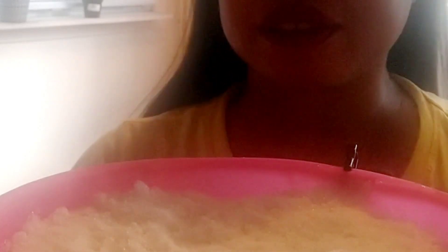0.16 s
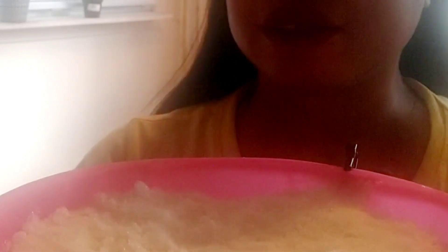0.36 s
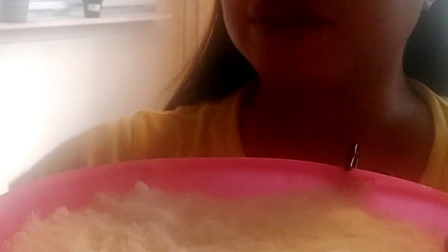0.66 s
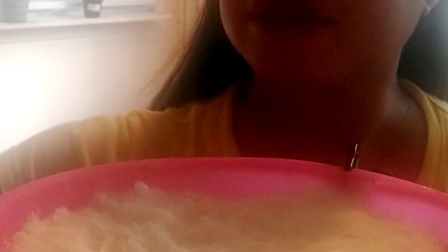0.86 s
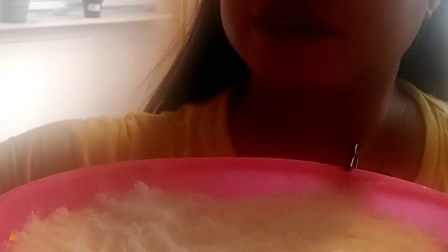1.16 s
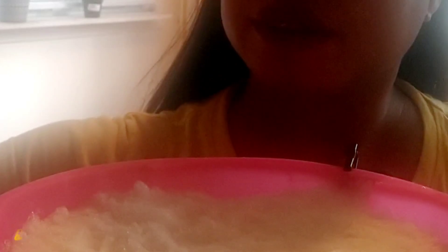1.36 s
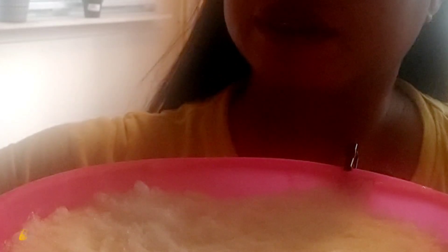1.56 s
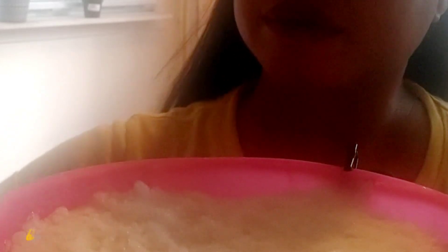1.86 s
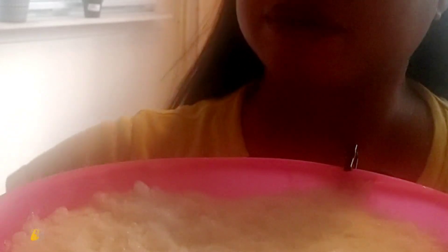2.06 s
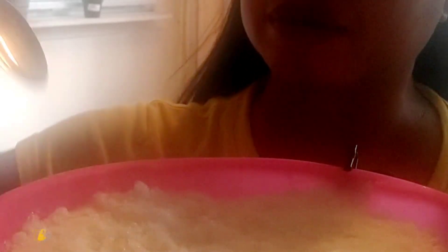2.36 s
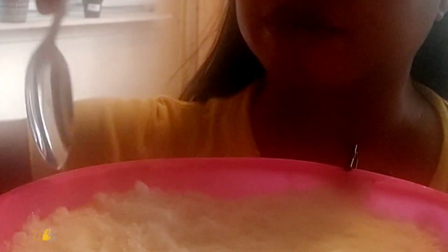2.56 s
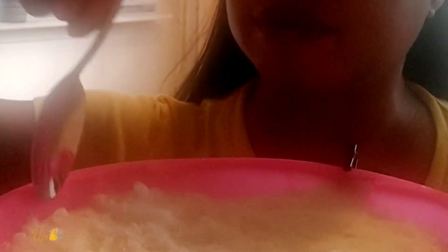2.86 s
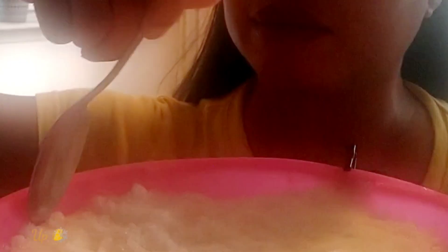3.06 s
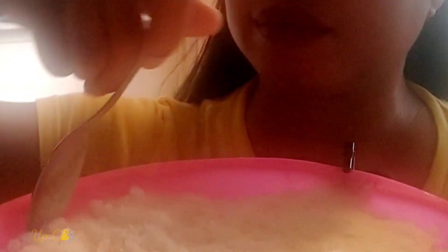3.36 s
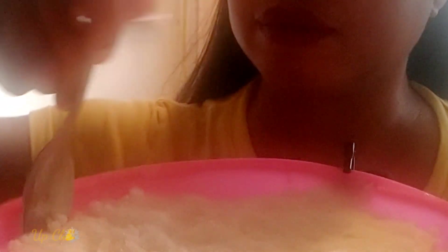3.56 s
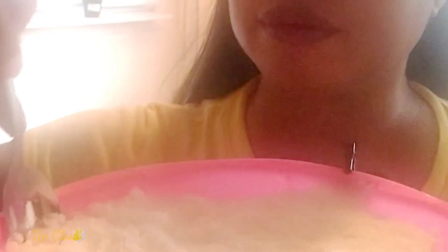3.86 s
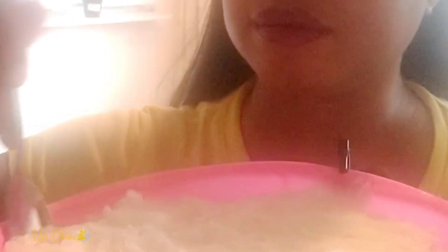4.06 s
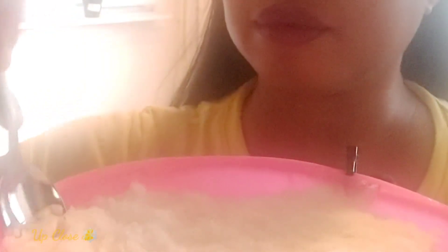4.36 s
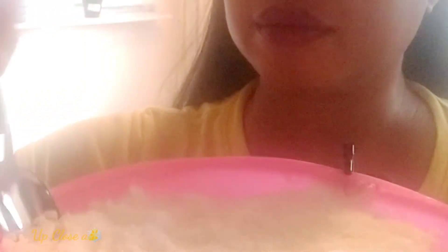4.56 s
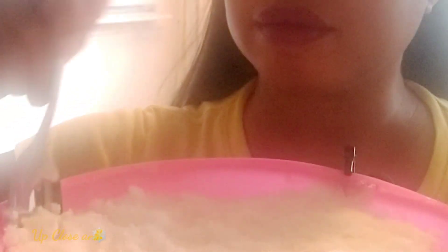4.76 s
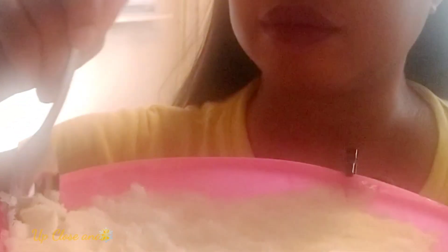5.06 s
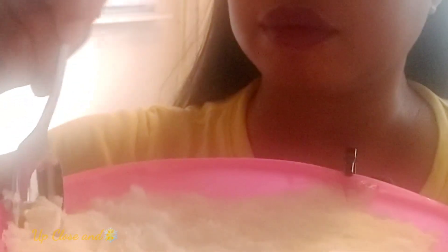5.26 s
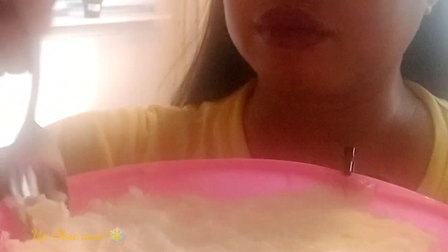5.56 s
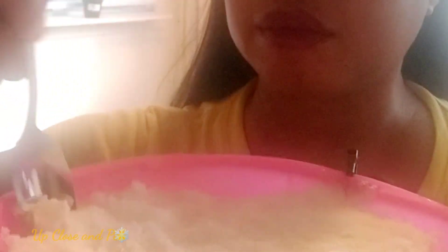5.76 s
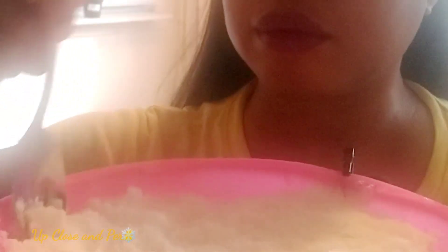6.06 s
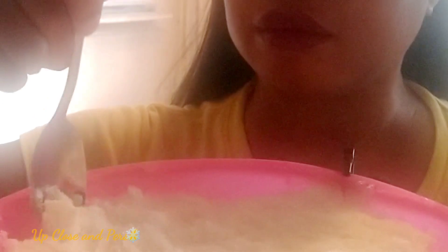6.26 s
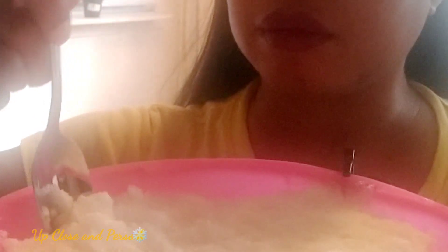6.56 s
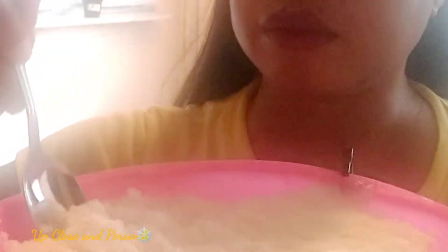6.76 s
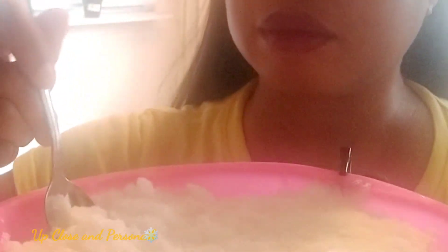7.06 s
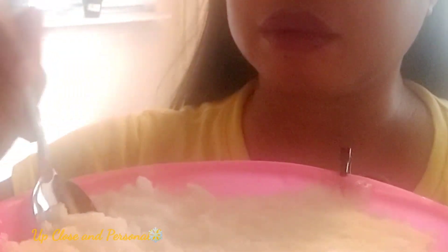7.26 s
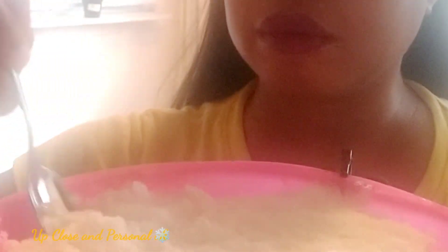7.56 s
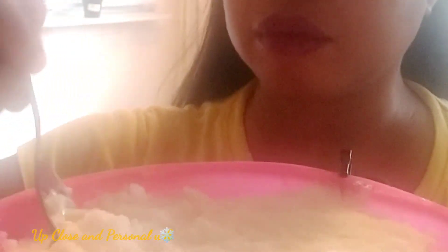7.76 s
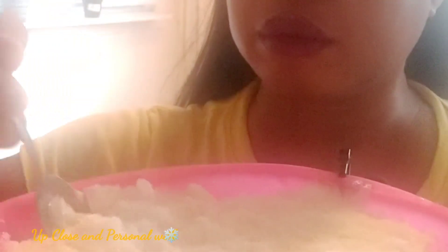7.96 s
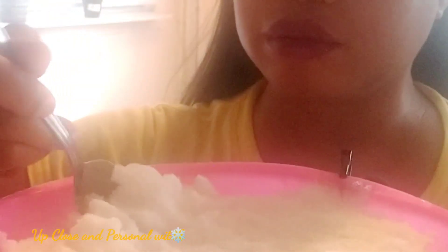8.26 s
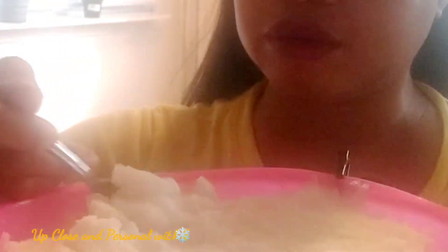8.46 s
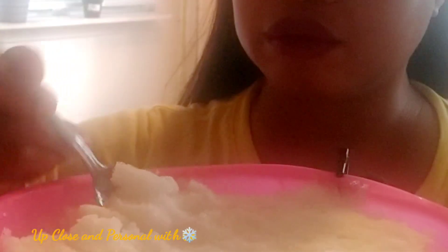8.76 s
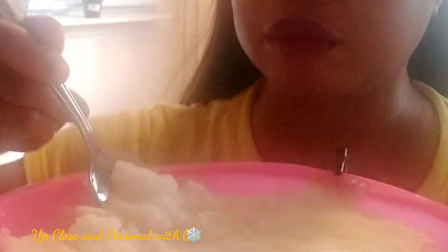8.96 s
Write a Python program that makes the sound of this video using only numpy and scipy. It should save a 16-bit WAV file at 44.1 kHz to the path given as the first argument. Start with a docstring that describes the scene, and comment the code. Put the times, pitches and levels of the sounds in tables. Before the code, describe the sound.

Faint room hum, a hard knock with a rattle, then crisp close crunching as a steel spoon digs crushed ice in a plastic bowl.

```python
"""A quiet room is heard first, its air noise under an appliance's hum and a faint mains buzz.
Close to a phone's microphone, a steel spoon then digs and scrapes powdery ice in a plastic bowl on a table.
Dense random fractures and single snaps ring the modes of bowl and blade; thuds are short low sines.
Something hard set down rings the table's modes, loose things rattle, and a short room tail follows."""
import sys
import numpy as np
from scipy import signal
from scipy.fft import rfft, irfft, next_fast_len
from scipy.io import wavfile
from scipy.ndimage import uniform_filter1d, map_coordinates

SR = 44100
rng = np.random.default_rng(int(sys.argv[2]) if len(sys.argv) > 2 else 0)


def inscribe(sig):
    """Save sig as 16-bit PCM at rate SR to the path in sys.argv[1].

    A 1-D sig is mono; a 2-D sig holds one channel per row.
    Samples are clipped to [-1, 1] before scaling.
    """
    pcm = np.round(np.clip(np.atleast_2d(sig).T, -1, 1) * 32767)
    wavfile.write(sys.argv[1], SR, pcm.astype(np.int16))


N = 402633
T = np.arange(N) / SR


def amp(db):
    """dB to gain."""
    return 10 ** (np.asarray(db) / 20)


def unit(x):
    """Scaled to rms 1."""
    return x / np.sqrt(np.mean(x ** 2) + 1e-20)


def at_times(points, s):
    """Straight lines through (time, value) points, read at times s."""
    return np.interp(s, *np.transpose(points))


def along(points, hz):
    """(frequency, value) points joined on a log frequency axis."""
    f, v = np.transpose(points)
    return np.interp(np.log(hz + 1), np.log(f + 1), v)


def wobble(rate):
    """A smooth random curve, rate knots a second."""
    return map_coordinates(rng.standard_normal(int(N * rate / SR) + 4), [T * rate])


def filtered(x, response):
    """x times a complex response of frequency."""
    m = next_fast_len(N + SR // 2)
    return irfft(rfft(x, m) * response(np.fft.rfftfreq(m, 1 / SR)), m)[..., :N]


def coloured(x, points):
    """x shaped by (frequency, level) points."""
    return filtered(x, lambda hz: amp(along(points, hz)))


def modes(table):
    """Causal response of resonances whose neighbours swing in opposite phase."""
    def response(f):
        total = 0
        for k, (centre, width, db) in enumerate(table):
            peak = 1j * f * width / (centre * centre - f * f + 1j * f * width)
            total = total + (-1) ** k * amp(db) * peak
        return total
    return response


def add(track, s, sound):
    """Mix a sound in at time s."""
    part = track[round(s * SR):][:len(sound)]
    part += sound[:len(part)]


# colour of the room's air noise: (frequency [Hz], relative level [dB per Hz])
AIR_COLOUR = [(15, -36), (25, -6), (79, -4), (173, -7.5), (253, -6.5), (297, -7.5), (469, -7), (509, -12.5),
              (782, -19), (970, -16.5), (1340, -24), (1570, -23.5), (8350, -43.5), (11500, -44.5),
              (15500, -48)]
# steady tones of the appliance: (frequency [Hz], relative level [dB])
HUM_TONES = [(129.2, -62), (172.3, -57.5), (215.3, -67), (301.5, -65.5), (360.7, -67), (516.8, -69),
             (576.0, -73.5), (969.0, -80.5), (995.9, -75.5)]


def room_tone():
    """Broadband air noise with appliance tones that waver in level and phase."""
    air_db = -56.5 + 0.082 * wobble(2.76)
    air = unit(coloured(rng.standard_normal(N), AIR_COLOUR))
    hum = np.zeros(N)
    for hz, db in HUM_TONES:
        level = amp(db + 3.5 + 2.25 * wobble(6))
        cycles = hz * T + 0.079 * wobble(4) + rng.random()
        hum += level * np.sin(2 * np.pi * cycles)
    return amp(air_db) * air + hum


# strength of the mains buzz: (frequency [Hz], relative level of the strongest lines [dB])
BUZZ_COLOUR = [(6000, -110), (8700, -97), (10000, -93), (12000, -92.5), (13500, -96), (15000, -102)]
MAINS_HZ, SPARK_HZ = 60, 627.5  # repeats of the whole run; sparks within it
SPARKS, FIRST_SPARK_S = 5, 0.00596


def buzz():
    """A short run of sparks in every mains cycle, written as mains multiples."""
    hz = MAINS_HZ * np.arange(100, 256)
    spark_s = FIRST_SPARK_S + np.arange(SPARKS) / SPARK_HZ
    run = np.exp(-2j * np.pi * np.outer(hz, spark_s)).mean(axis=1)
    lines = amp(along(BUZZ_COLOUR, hz) - 0.3) * run
    cycle = np.arange(SR // MAINS_HZ) / SR
    wave = np.sqrt(2) * lines @ np.exp(2j * np.pi * np.outer(hz, cycle))
    return np.resize(wave.real, N)


# how long the room answers: (frequency [Hz], time to fall 60 dB [s])
ROOM_DECAY = [(200, 0.31), (2000, 0.41), (10000, 0.065)]


def room(x):
    """The room's answer is noise in which each frequency dies at its own speed."""
    hz, t, z = signal.stft(rng.standard_normal(SR // 2), SR, nperseg=256)
    decay = amp(-60 * t / along(ROOM_DECAY, hz)[:, None])
    tail = signal.istft(z * decay, SR, nperseg=256)[1]
    late = np.pad(x, (200, 0))  # 200 samples before the first reflection
    return signal.fftconvolve(late, tail / np.linalg.norm(tail))[:N]


def crushing(rate, spread_db, hiss):
    """Random fractures of widely spread size, in clumps, over a steady hiss."""
    breaks = rng.random(N) < rate * amp(5 * wobble(40)) / SR
    sizes = rng.standard_normal(N) * amp(spread_db * rng.exponential(size=N))
    return unit(breaks * sizes) + hiss * rng.standard_normal(N)


# colour of the rattle: (frequency [Hz], relative level [dB per Hz])
RATTLE_COLOUR = [(100, -24), (250, 0), (550, -0.5), (1000, -13), (3000, -20.5), (8000, -28.5), (15000, -36)]
# how loudly loose things rattle: (time [s], level [dB])
RATTLE_LEVEL = [(1.37, -76), (1.38, -59.5), (1.44, -56), (1.47, -76), (1.487, -53), (1.492, -34),
                (1.52, -50.5), (1.6, -50), (1.63, -61), (1.72, -76)]


def rattle():
    """Loose things chatter in dense random contacts."""
    loose = coloured(crushing(rate=610, spread_db=3.5, hiss=0.93), RATTLE_COLOUR)
    level_db = np.interp(T, *np.transpose(RATTLE_LEVEL), left=-120, right=-120)
    return amp(level_db) * unit(loose)


# something hard set down on the table: (time [s], relative level [dB], hardness [dB per 3 octaves])
KNOCKS = [(1.378, -27, -10.5), (1.39, -48, -8), (1.418, -37, -10), (1.427, -41, -1), (1.4887, -23.5, 5.5),
          (1.496, -25, 0), (1.5184, -46, -8)]
# modes of the table: (frequency [Hz], relative level [dB], time to fall 60 dB [s])
TABLE_MODES = [(265, -9, 0.056), (477, 8.5, 0.014), (526, -7.5, 0.08), (697, -4.5, 0.055), (837, 2, 0.025),
               (1554, -7, 0.05), (2250, -9, 0.036), (2530, -14, 0.051), (3275, -15, 0.04),
               (4060, -8.5, 0.025), (5640, -24, 0.043), (6850, -18, 0.026), (7740, -11, 0.014)]


def knocks():
    """Each blow rings the table at new strengths, a harder blow favouring the higher modes."""
    out, t = np.zeros(N), np.arange(SR // 3) / SR
    hz, level_db, t60 = np.transpose(TABLE_MODES)[..., None]
    scatter = rng.normal(0, 1.5, (len(KNOCKS), len(TABLE_MODES), 1))
    onset = 1 - np.exp(-t / 0.000075)
    for (s, db, hard_db), luck_db in zip(KNOCKS, scatter):
        tilt_db = hard_db * np.log2(hz / 450) / 3
        size = amp(db - 9.0 + level_db + luck_db + tilt_db - 60 * t / t60)
        add(out, s, np.sum(size * np.sin(2 * np.pi * hz * t), axis=0) * onset)
    return out + rattle()


# the bowl pushed against the table:
# (time [s], relative level [dB], pitch [Hz], time to fall 60 dB [s] (10 ms at least), edge over level [dB])
THUDS = [(.472, -35, 109, .06, -2.5), (2.851, -36, 112, 0.079, -3), (3.232, -27, 116, 0.045, -3.5),
         (3.262, -40.5, 110, 0.042, 3.5), (3.381, -36.5, 131, 0.023, 0), (3.469, -29.5, 161, 0.049, -8),
         (3.475, -32, 205, 0.019, 6.5), (3.774, -38, 130, 0.034, -1), (4.238, -25.5, 163, 0.0099, 1.5),
         (4.34, -37, 85, 0.071, -5), (4.411, -38.5, 150, 0.026, 7), (4.479, -34, 110, 0.051, -4),
         (4.526, -34.5, 140, 0.039, 1.5), (5.148, -56, 150, 0.026, -2), (5.784, -45, 133, 0.065, 3),
         (6.144, -42, 170, 0.036, 4), (6.853, -38, 89, 0.086, -7), (7.315, -36, 148, 0.023, -11),
         (7.502, -37.5, 100, 0.038, -17), (7.671, -35, 100, 0.035, -18), (8.187, -47, 100, 0.043, -3),
         (8.604, -38, 101, 0.065, -15)]


def thuds():
    """A low push that dies in a few cycles, led by a short blunt edge."""
    out, t = np.zeros(N), np.arange(SR // 5) / SR
    edge = t / 0.00032 * (1 - t / 0.00071) * np.exp(1 - t / 0.00059)
    for s, db, hz, t60, edge_db in THUDS:
        push = amp(6 - 60 * t / max(t60, .01)) * np.sin(2 * np.pi * hz * t)
        add(out, s, amp(db) * (push + amp(edge_db) * edge))
    return out


# each push of the spoon through the ice: (time of the peak [s], swell [s], fade [s], crunch level [dB],
# blade over crunch [dB], shake of the table [dB])
PUSHES = [(.479, .3, .25, -76, -12, -47.5), (.838, .08, 0.085, -61, -6, -54),
          (.914, .06, 0.17, -65, -6, -70), (1.303, 0.14, 0.059, -63.5, -13, -57),
          (2.869, 0.029, 0.048, -55, -5, -41.5), (3.231, .07, 0.05, -59.5, -12, -47),
          (3.322, 0.15, .07, -58, -5, -43.5), (3.376, 0.024, 0.039, -46, -4, -39),
          (3.474, 0.16, 0.099, -52.5, -3, -44), (3.586, .06, 0.027, -50, -1.5, -49),
          (3.688, 0.37, 0.058, -59, -4, -54), (3.79, 0.058, 0.076, -46, -1.5, -53),
          (3.887, .2, 0.06, -51.5, -3.5, -46.5), (3.993, 0.089, 0.041, -54.5, -3.5, -53),
          (4.053, 0.049, 0.054, -56.5, -2, -66), (4.127, 0.16, 0.24, -58.5, -6, -52),
          (4.244, 0.076, 0.074, -45, -3.5, -39.5), (4.348, 0.024, .05, -49.5, -1, -49),
          (4.412, .07, .1, -45.5, -4.5, -41), (4.502, 0.13, 0.11, -46.5, -6, -41.5),
          (4.771, 0.41, 0.079, -58, -7, -60), (4.865, .15, .25, -58, -7, -56),
          (5.158, 0.17, 0.12, -51.5, -7, -51.5), (5.356, 0.089, 0.11, -59.5, -8, -51.5),
          (5.533, 0.11, 0.18, -62.5, -12, -65), (5.615, 0.14, 0.12, -65, -3, -51),
          (5.789, 0.25, 0.22, -65.5, -3.5, -59), (5.944, 0.15, 0.042, -61, -7, -57),
          (6.15, 0.027, 0.058, -49, -8.5, -47), (6.431, .3, .3, -70.5, -0.5, -53.5),
          (6.693, .07, 0.11, -53.5, -5, -47.5), (6.824, 0.29, 0.1, -51.5, -7.5, -47.5),
          (6.959, .1, 0.35, -48.5, -3.5, -44), (7.042, 0.097, 0.078, -37.5, -9.5, -44),
          (7.12, 0.13, 0.041, -46, -5, -42), (7.17, 0.1, 0.082, -53.5, -11, -46.5),
          (7.343, 0.4, 0.1, -52.5, -8.5, -58.5), (7.491, 0.15, 0.074, -54.5, -7, -56),
          (7.605, 0.19, .08, -60.5, -16, -55), (7.657, 0.014, 0.041, -48, -6, -51),
          (7.7, 0.04, 0.29, -47.5, -8.5, -52), (7.8, 0.15, 0.03, -49, -4, -43.5),
          (7.85, 0.023, .3, -56.5, -2, -59), (8.046, 0.42, 0.21, -51, -7, -47),
          (8.205, 0.12, 0.12, -41.5, -3.5, -40), (8.317, 0.19, 0.1, -51, -6.5, -41),
          (8.596, .15, 0.26, -41, -6, -44), (8.782, .3, 0.13, -47.5, -4, -49),
          (8.956, 0.087, 0.18, -55, -7, -54.5), (9.129, .15, .1, -64, -3, -60)]
# between pushes, one level each [dB]: crunch, blade, shake
RESTING_LEVELS = (-82.5, -81.5, -68.5)
FADE_DB = 21.5  # change of level over one swell or fade time


def pushes():
    """Crunch, blade and shake in dB: every push swells to its peak and fades, over a resting level."""
    t = np.arange(N // 64 + 1) * 64 / SR
    power = amp(RESTING_LEVELS)[:, None] ** 2 * np.ones(len(t))
    for s, swell, fade, db, blade_db, shake_db in PUSHES:
        drop_db = FADE_DB * np.maximum((s - t) / max(swell, .005), (t - s) / max(fade, .005))
        peak_db = np.array([[db], [db + blade_db], [shake_db]])
        power = power + amp(peak_db - drop_db) ** 2
    return [np.interp(T, t, 10 * np.log10(p)) for p in power]


# sliding powder: (time [s], hiss over the fractures [gain])
POWDER = [(0, .6), (4.6, .55), (6.5, .7), (7.5, .7), (7.95, 1.14), (9.13, 1.2)]


def small_snaps():
    """Lesser breaks at chance moments, following the crunch around them and muffled by powder."""
    luck = rng.random((200, 5))
    s = luck[:, 0] * (N - 1) / SR
    muffle_db = 6.5 * at_times(POWDER, s)
    scatter_db = -3.5 * np.log(luck[:, 1] + 0.056)
    db = np.interp(s, T, pushes()[0]) + 9.5 - muffle_db + scatter_db
    bowl_hz, blade_hz = 1300 * 3.9 ** luck[:, 2], 5000 * 2.0 ** luck[:, 4]
    return list(zip(s, db, bowl_hz, -14 + 14 * luck[:, 3], blade_hz))


# the clearest single crystals breaking, and small handling ticks:
# (time [s], relative level [dB], bowl pitch [Hz], blade over bowl, before trims [dB], blade pitch [Hz])
CLEAR_SNAPS = [(0.038, -51, 4030.0, 4, 6600), (0.8022, -43, 4000.0, -6, 5440.0),
               (0.8201, -45, 2470.0, -6, 5160.0), (0.834, -45, 1200.0, -2, 5000.0),
               (0.9056, -46.0, 4260.0, 1, 6170.0), (0.9425, -46.5, 2560.0, -9.0, 5900.0),
               (1.0588, -43, 1700.0, -13, 5630.0), (1.3127, -44, 1890.0, -12, 4930),
               (1.9129, -52, 2290.0, -13.0, 5830.0), (2.1274, -56, 2460.0, 3, 5950.0),
               (2.8609, -48.0, 4850.0, 4, 6180.0), (3.1979, -45.5, 2260.0, 0.0, 5320.0),
               (3.2274, -39, 1520.0, -7, 6290.0), (3.2784, -41, 2190.0, -3, 5840.0),
               (3.3017, -38.5, 1440.0, -2, 6080.0), (3.3669, -34.0, 4760.0, 4, 5950),
               (3.3753, -31.0, 1550, 1, 5950), (3.377, -36, 2280, 6, 7500),
               (3.3814, -34, 3370.0, -3, 6450.0), (3.4039, -40, 1370.0, -8.0, 6660.0),
               (3.4171, -38.0, 4010.0, -2.0, 5080.0), (3.435, -29, 2270, -13.0, 5600.0),
               (3.4679, -35, 1620.0, -1, 6000.0), (3.4722, -31, 3500.0, 0, 6430.0),
               (3.476, -25, 3700, -0.5, 5130.0), (3.5809, -44, 1350.0, 3, 5280.0),
               (3.5842, -37.5, 1470.0, -4, 7030.0), (3.5916, -39, 4990.0, 0.0, 7660.0),
               (3.772, -32.5, 1280, -5, 7650.0), (3.7936, -38, 4600.0, -7.0, 5040.0),
               (3.958, -27, 3940.0, -6, 4970), (4.121, -41.0, 3490.0, -10.0, 5000.0),
               (4.2146, -30, 1420, -12, 5000.0), (4.2392, -31, 4140.0, -10, 7810.0),
               (4.2465, -31, 1660, -2, 6100.0), (4.2567, -38, 1190, -1, 6660.0),
               (4.3449, -45, 1660.0, 2, 9000), (4.3524, -41, 4000.0, -2.0, 7730.0),
               (4.4079, -27.0, 1930.0, -4, 5010.0), (4.41, -30, 1270, 2, 5230),
               (4.4493, -31.5, 3380.0, -8, 5150.0), (4.461, -35.0, 3070.0, -7.0, 5000.0),
               (4.488, -29.0, 3070.0, -7, 6120.0), (4.4944, -33, 1450.0, -7.0, 5970.0),
               (4.5044, -31.0, 1310.0, -13.0, 5920.0), (4.5109, -33, 2850.0, -10.0, 5480.0),
               (4.526, -30, 1300.0, -12.0, 6320.0), (4.5545, -37, 1970.0, -4, 5900.0),
               (4.6347, -41, 1440.0, -4, 5180.0), (4.7726, -36.5, 2600, -3, 5070),
               (4.8649, -44.0, 3610.0, -6.0, 5690.0), (4.9504, -44, 3270.0, -3, 7850.0),
               (4.9792, -44, 1640, -16.0, 5000.0), (5.1177, -46, 3430.0, 1, 7880.0),
               (5.1466, -31.5, 3270, -14.0, 5800.0), (5.1638, -37, 4720.0, 0, 7860.0),
               (5.351, -38, 3260.0, -21.0, 5750.0), (5.5023, -48, 3230.0, -18, 6080.0),
               (5.611, -40, 1960, 3.5, 6140.0), (5.77, -45, 3030.0, -8, 7840.0),
               (5.9161, -51.0, 1620.0, 6.5, 6180.0), (6.087, -40.5, 2530, -8, 5000.0),
               (6.1444, -45, 3000.0, -11, 5730.0), (6.1497, -44, 4670.0, -11, 6100.0),
               (6.687, -35, 1750.0, -10, 5000.0), (6.6943, -35.5, 2030.0, -2.0, 5000.0),
               (6.832, -40.0, 2060.0, -2, 7140.0), (7.0095, -27.0, 1970, -12, 5020.0),
               (7.025, -27, 1890.0, -9, 5000.0), (7.0303, -24.0, 1670.0, 4, 9200),
               (7.037, -12.0, 1920, -9, 5000.0), (7.0421, -9.5, 2080, -11, 5080.0),
               (7.0437, -11.5, 3020, -9, 9030), (7.0445, -18, 2050, -6, 9000),
               (7.0468, -20, 3430, -10, 9050), (7.059, -17.5, 2120, -6, 8900),
               (7.063, -20, 2490.0, -10.0, 5000.0), (7.1213, -24.5, 1900.0, -14, 9050),
               (7.1659, -33.5, 3240, -13, 7760.0), (7.245, -40, 1990.0, -9, 8170.0),
               (7.3959, -39, 3970.0, -11, 8110.0), (7.5102, -40, 3320.0, -12.0, 5000.0),
               (7.6504, -33, 3890.0, -5.0, 8190.0), (7.654, -33, 3000, -9, 9000),
               (7.6603, -29, 3410.0, -2.0, 9030.0), (7.6949, -33, 2710.0, -15.0, 5000.0),
               (7.781, -36, 3720.0, -11, 7750.0), (7.7939, -27.5, 4110.0, -6, 7260.0),
               (7.7977, -28, 4660.0, -10, 6450.0), (7.8421, -36, 4780.0, -1.0, 5790.0),
               (7.8481, -29.5, 4770.0, -2, 9200), (7.8858, -43, 4540.0, 1, 7380.0),
               (8.2714, -38.0, 3300.0, -7.0, 7240.0), (8.3464, -42, 1900.0, -11.0, 5870.0),
               (8.4709, -40, 2850.0, 1, 5780.0), (8.5188, -40.0, 3230.0, -5.0, 6010.0),
               (8.7304, -36, 3010.0, -3.0, 7800.0), (8.943, -39, 3260, -10.0, 5000.0),
               (9.008, -38, 4880.0, -3, 5440), (9.0457, -46, 2870.0, -3, 5000.0)]
# modes of the plastic bowl: (frequency [Hz], width [Hz], relative level [dB])
BOWL_MODES = [(1254, 227, -3.5), (1660, 320, -0.5), (2050, 276, -3), (2510, 500, -4.5), (3230, 376, -0.5),
              (4057, 287, -1), (4860, 290, -2.5)]
# modes of the spoon's blade: (frequency [Hz], width [Hz], relative level [dB])
BLADE_MODES = [(5880, 750, 3.5), (6750, 240, 2.5), (7010, 260, 2), (8030, 320, 4), (8570, 260, 3.5),
               (10430, 3300, -7), (13500, 3000, -14)]
CRACK_S, JOLT_T60_S, RING_CYCLES = 0.00008, 0.0025, 14  # onset; jolt's fall; bowl pitch cycles to fall 60 dB


def snaps():
    """Each break is a sharp crack: a few cycles at two pitches and a brief jolt to bowl and blade."""
    rings, bowl, blade = np.zeros(N), np.zeros(N), np.zeros(N)
    t = np.arange(SR // 50) / SR

    def ring(db, hz, t60):
        return amp(db - 60 * t / t60) * np.sin(2 * np.pi * hz * t) * (1 - np.exp(-t / CRACK_S))

    def dull(hz):
        treble_loss = 1 / (1 + 1j * hz / 10500) ** 2
        return treble_loss * (1j * hz / (900 + 1j * hz)) ** 3

    breaks = small_snaps() + [tuple(row) for row in CLEAR_SNAPS]
    jolts = rng.standard_normal((len(breaks), 2, len(t))) * amp(-60 * t / JOLT_T60_S)
    jolts /= np.linalg.norm(jolts, axis=2, keepdims=True)
    for (s, db, hz, blade_db, blade_hz), jolt in zip(breaks, jolts):
        add(rings, s, ring(db + 3.0, hz, RING_CYCLES / hz))
        add(rings, s, ring(db + blade_db + 1.0, blade_hz, 0.0078))
        add(bowl, s, amp(db + 20) * jolt[0])
        add(blade, s, amp(db + blade_db + 16) * jolt[1])
    jolted = filtered(bowl, modes(BOWL_MODES)) - filtered(blade, modes(BLADE_MODES))
    return filtered(rings + jolted, dull)


def shifting(force, table, shift_db):
    """Resonances drift apart in strength as the point of contact moves; treble falls above 9.5 kHz."""
    x = np.zeros(N)
    for k, row in enumerate(table):
        x += amp(shift_db * wobble(16)) * (-1) ** k * filtered(force, modes([row]))
    return unit(filtered(x, lambda hz: 1 / (1 + 1j * hz / 9500) ** 2 * 1j * hz / (800 + 1j * hz)))


# low boom of the loaded bowl: (frequency [Hz], relative level [dB per Hz])
BOOM_COLOUR = [(150, -27), (260, 2), (500, -3.5), (900, -9.5), (1300, -36)]
# shake of the table: (frequency [Hz], relative level [dB per Hz])
SHAKE_COLOUR = [(20, -36), (45, -4.5), (90, 2.5), (130, -0.5), (250, -12), (600, -51.5)]
# mode of the spoon's tip, passed twice: (frequency [Hz], width [Hz], level [dB])
TIP_MODE = [(9020, 360, 0)]
# contact of the tip, later halved in gain: (time [s], level over the blade [dB])
TIP_CONTACT = [(0, -7), (6.3, -4), (6.7, -1), (7.05, 3.5), (7.4, -1), (8.2, -3), (8.5, -13), (9.13, -20)]


def spoon():
    """Crushed ice rings the bowl and the spoon's blade; the push shakes the table."""
    crunch_db, blade_db, shake_db = pushes()
    boom_db = -19.5 + 0.3 * crunch_db + 0.4 * shake_db
    force = crushing(rate=2200, spread_db=2.0, hiss=at_times(POWDER, T))
    force *= amp(2.8 * wobble(30))
    force /= np.sqrt(np.abs(uniform_filter1d(force ** 2, SR // 25)) + 1e-9)  # the hand sets the strength
    bowl = shifting(force, BOWL_MODES, shift_db=2.1)
    blade = shifting(force, BLADE_MODES, shift_db=2.1)
    tip = unit(filtered(force, lambda hz: modes(TIP_MODE)(hz) ** 2))
    tip *= amp(at_times(TIP_CONTACT, T))
    boom = unit(coloured(force, BOOM_COLOUR))
    shake = unit(coloured(rng.standard_normal(N), SHAKE_COLOUR))
    # neighbouring modes swing in opposite phase, so the blade is subtracted
    crunch = amp(crunch_db) * bowl - amp(blade_db) * (blade + .5 * tip)
    return crunch + amp(boom_db) * boom + amp(shake_db) * shake


def scene():
    """All sources at one microphone, with the room's answer to the ice and the knocks."""
    blows = knocks()
    ice = spoon() + snaps()
    reflections = room(amp(-16) * ice + amp(-11) * blows)
    return (ice + blows + thuds() + reflections + room_tone() + buzz())[None]


def record(dry):
    """The phone's microphone drops the deepest bass and keeps nothing from 15.5 kHz up."""
    return filtered(dry, lambda hz: (1j * hz / (45 + 1j * hz)) ** 2 * (hz < 15500))


dry = scene()
out = record(dry)
inscribe(out)
```